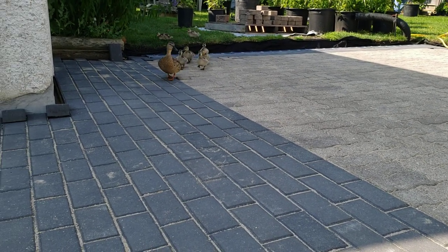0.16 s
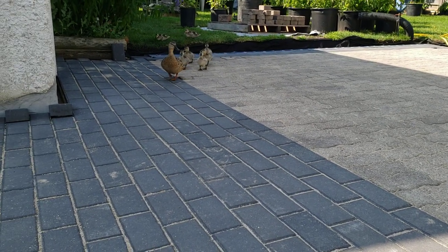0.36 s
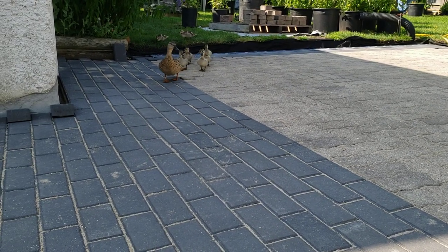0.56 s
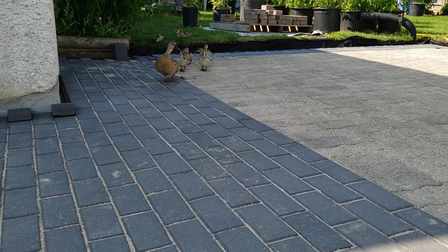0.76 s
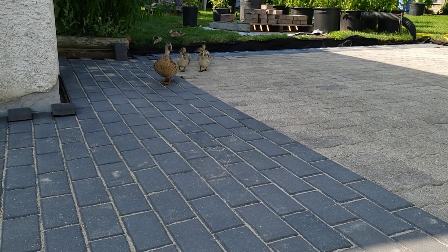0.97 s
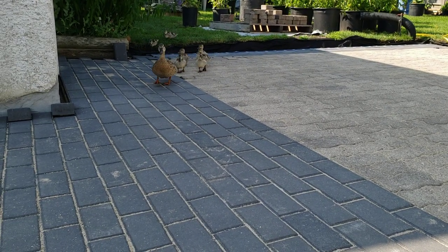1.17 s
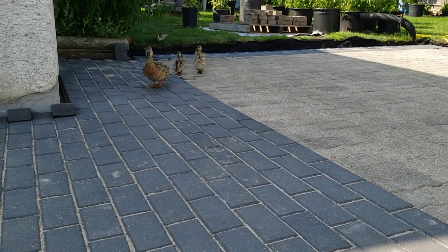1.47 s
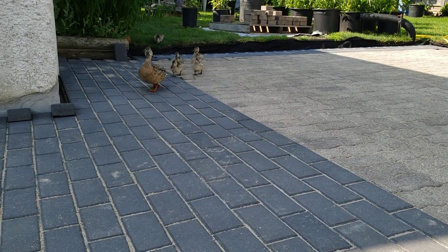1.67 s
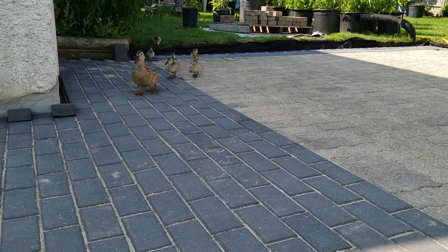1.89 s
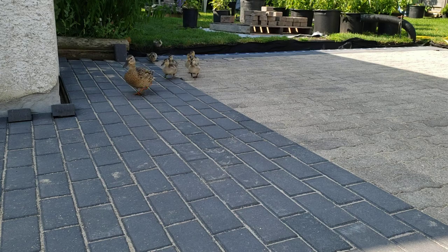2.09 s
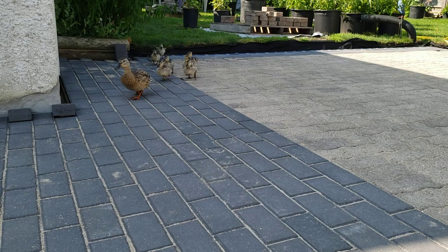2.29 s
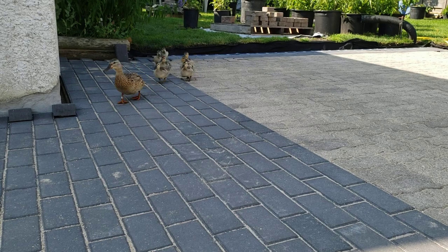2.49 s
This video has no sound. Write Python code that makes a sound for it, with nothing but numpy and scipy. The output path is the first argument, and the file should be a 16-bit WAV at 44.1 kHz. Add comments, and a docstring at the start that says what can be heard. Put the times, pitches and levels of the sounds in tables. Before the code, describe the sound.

Ducklings peep twice, short and high with a quavering fall, at some distance in a paved yard; low wind rumble and faraway machine hum continue beneath, with tiny ticks, faint chirps and light microphone hiss.

```python
"""Ducklings in a paved yard peep twice: quavering, falling whistles, scattered by paving and walls.
Faint chirps (short noisy-pitched slides) and ticks (decaying band-passed noise) sound around them.
A low rumble of coloured noise, its deepest part wind on the microphones, rises and sinks.
Distant machinery hums from the left in wavering tones. A thin, high rustle of grainy noise
comes and goes over the microphone's steady-coloured hiss."""
import sys
import numpy as np
from scipy import signal
from scipy.fft import rfft, irfft
from scipy.io import wavfile

SR = 44100
rng = np.random.default_rng(int(sys.argv[2]) if len(sys.argv) > 2 else 0)


def to_wav(sig):
    """Store sig (one row per channel, or 1-D mono) as 16-bit WAV at the path in sys.argv[1].

    Samples outside -1..1 are clipped; the rate is SR.
    """
    pcm = np.clip(np.atleast_2d(sig), -1, 1) * 32767
    pcm = np.round(pcm).astype(np.int16)
    wavfile.write(sys.argv[1], SR, pcm.T)  # frames by channels


N = 116865


def amp(db):
    """Decibels to gain."""
    return 10 ** (np.asarray(db) / 20)


def unit(x):
    """Scales to rms 1."""
    return x / np.sqrt(np.mean(x ** 2) + 1e-20)


def bins():
    """Frequencies of a full-length spectrum [Hz]."""
    return np.fft.rfftfreq(N, 1 / SR)


def colour(points):
    """Interpolates a table on a log-frequency axis."""
    hz, value = np.transpose(points)
    return np.interp(np.log(bins() + 1), np.log(hz + 1), value)


def curve(points):
    """Interpolates a table over time."""
    time_s, value = np.transpose(points)
    return np.interp(np.arange(N) / SR, time_s, value)


def shape(x, gain):
    """Applies a gain per frequency bin."""
    return irfft(rfft(x) * gain, N)


def drift(rate_hz):
    """Smooth random curve of rms 1: noise under a Gaussian low-pass."""
    return unit(shape(rng.standard_normal(N), np.exp(-(bins() / rate_hz) ** 2)))


def pan(lean_db):
    """Left and right gains for a left-minus-right level difference."""
    return amp(np.array([[.5], [-.5]]) * lean_db)


def add(mix, start_s, sound):
    """Mixes a sound in place at a start time, cut at the end of the mix."""
    start = max(round(start_s * SR), 0)
    part = mix[..., start:][..., :sound.shape[-1]]
    part += sound[..., :part.shape[-1]]


PORT_DELAY_S = 0.000393


def ports(pair):
    """Sound from the left reaches the right microphone port a little later."""
    late = np.exp(-2j * np.pi * bins() * PORT_DELAY_S)
    return np.array([pair[0], shape(pair[1], late)])


# Noise shared by the ports: (frequency [Hz], left-right likeness [0..1])
PORT_LIKENESS = [(35, .35), (70, .72), (130, .93), (300, .82), (700, .42), (1600, .38), (3000, .2),
                 (8000, .05)]
FLUTTER_RMS_DB, FLUTTER_HZ = 0.75, 15


def air(spectrum):
    """Gently fluttering noise, partly shared by both ports, each with its own colour."""
    flutter = amp(FLUTTER_RMS_DB * drift(FLUTTER_HZ))
    a, b = rfft(rng.standard_normal((2, N)) * flutter)
    same = np.clip(colour(PORT_LIKENESS), 0, 1)
    left = a * amp(colour([(hz, db) for hz, db, _ in spectrum]))
    right = (same * a + np.sqrt(1 - same ** 2) * b) * amp(colour([(hz, db) for hz, _, db in spectrum]))
    return ports(np.sqrt(SR / 2) * irfft(np.array([left, right]), N))


# Rumble spectrum before level curves: (frequency [Hz], left density [dB/Hz], right density [dB/Hz])
RUMBLE_SPECTRUM = [(11.8, -100, -100), (21.3, -77, -85.5), (33.3, -79.5, -74), (52, -65, -62.5),
                   (90.6, -69, -68.5), (132.7, -69, -67), (214, -74.5, -72), (323, -81, -80.5),
                   (457, -86.5, -82.5), (810, -94, -86.5), (1112, -88.5, -89), (1163, -99, -90.5),
                   (1670, -90.5, -100), (1728, -90.5, -105), (2236, -105, -109), (2890, -112, -115),
                   (4930, -140, -140)]
# Gain below the crossover: (time [s], level [dB])
BASS_LEVEL = [(0, -8), (.14, 2), (.21, -3), (.33, -0.5), (.48, -2.5), (.58, -1), (.66, 2.5), (.9, -6.5),
              (1.09, 6), (1.16, 0), (1.32, 1.5), (1.41, -2.5), (1.5, 3), (1.72, 1), (1.85, 3.5),
              (2.17, -4.5), (2.27, 2.5), (2.38, 0.5), (2.65, -1)]
# Gain above the crossover: (time [s], level [dB])
UPPER_LEVEL = [(0, -1.5), (.9, -1), (1.6, -1), (2.1, -1), (2.65, 0)]
BASS_CROSSOVER_HZ = 123


def rumble():
    """Low noise split at a crossover; its deepest part, wind on the microphones, rises and sinks."""
    noise = air(RUMBLE_SPECTRUM)
    bass = shape(noise, 1 / (1 + (bins() / BASS_CROSSOVER_HZ) ** 6))
    return bass * amp(curve(BASS_LEVEL)) + (noise - bass) * amp(curve(UPPER_LEVEL))


# Hiss spectrum: (frequency [Hz], left density [dB/Hz], right density [dB/Hz])
HISS_SPECTRUM = [(1850, -120, -120), (3450, -111, -114), (4600, -118, -119), (6630, -118, -124),
                 (7880, -127, -129), (10250, -120, -121), (12400, -113, -114), (16000, -114, -113)]


def hiss():
    """Microphone hiss: noise with a fixed colour and slight flutter."""
    return air(HISS_SPECTRUM)


# Machine tones: (frequency [Hz], level [dB], left minus right [dB])
HUM_TONES = [(161.9, -60, -4.5), (262.4, -63, -2), (357.2, -61, 3), (479.7, -79.5, -1.5),
             (647.4, -71.5, -12), (780, -87, 0.5), (899, -78.5, -10.5), (1360, -96, 2.5), (1442, -78, 5),
             (1586, -78, 8.5)]
# Deepest tone: (time [s], level [dB])
DRONE_LEVEL = [(0, -66), (.55, -50.5), (.75, -50.5), (.95, -53.5), (1.4, -57), (1.58, -42.5), (1.75, -47),
               (1.9, -66), (2.3, -46.5), (2.65, -49.5)]
DRONE_HZ, DRONE_LEAN_DB = 108.4, -3.5
WANDER_RMS_HZ, WAVER_RMS, WAVER_RATE_HZ = 4.5, .7, 13  # waver: share of gain, before unit()


def hum():
    """Distant machinery tones, random in pitch and gain; the deepest swells and recedes."""
    out = np.zeros((2, N))
    drone = (DRONE_HZ, curve(DRONE_LEVEL), DRONE_LEAN_DB)
    for hz, db, lean_db in HUM_TONES + [drone]:
        cycles = np.cumsum(hz + WANDER_RMS_HZ * drift(WAVER_RATE_HZ)) / SR
        tone = np.sqrt(2) * np.sin(2 * np.pi * (cycles + rng.random()))
        waver = unit(1 + WAVER_RMS * drift(WAVER_RATE_HZ))
        out += amp(db) * pan(lean_db) * waver * tone
    return ports(out)


# Swells, each channel 3 dB above this before the lean: (time [s], level [dB])
RUSTLE_LEVEL = [(0, -105), (1.32, -100), (1.36, -70.5), (1.44, -71.5), (1.53, -78), (1.64, -81),
                (1.71, -75), (1.79, -100), (2.18, -78), (2.23, -71), (2.41, -68), (2.45, -63),
                (2.52, -65.5), (2.55, -69.5), (2.6, -77), (2.65, -77)]
# Relative spectrum: (frequency [Hz], density [dB])
RUSTLE_SPECTRUM = [(3000, -2.5), (5200, -16.5), (6500, -4), (7900, -28), (9000, -15.5), (10500, -5),
                   (13000, -4.5), (15500, -0.5)]
# Stereo position: (time [s], left minus right [dB])
RUSTLE_POSITION = [(1.4, 0.5), (2.25, 1.5), (2.47, 0), (2.55, 7)]
GRAIN_RMS_DB, GRAIN_RATE_HZ = 1.5, 148


def rustle():
    """Thin high noise, grainy by fast random gain, in a few swells."""
    grains = rng.standard_normal((2, N)) * amp(GRAIN_RMS_DB * drift(GRAIN_RATE_HZ))
    noise = np.sqrt(2) * unit(shape(grains, amp(colour(RUSTLE_SPECTRUM))))
    return noise * amp(curve(RUSTLE_LEVEL)) * pan(curve(RUSTLE_POSITION))


# Taps: (time [s], onset level [dB], centre [Hz], Gaussian width [octaves], left minus right [dB])
TICK_EVENTS = [(.803, -51, 1640, 0.32, 1), (1.102, -72, 5760, .12, -6), (1.102, -64, 14000, 0.18, -7),
               (1.363, -72, 6200, 0.18, 5), (1.435, -60, 13500, 0.18, -8), (2.072, -46.5, 665, 0.21, -2),
               (2.477, -72, 11000, .6, 0), (2.549, -59, 13080, 0.21, 3)]
TICK_DECAY_S = 0.0016  # to 1/e


def ticks():
    """Tiny dry taps: exponentially decaying noise through a log-Gaussian band."""
    out, t = np.zeros((2, N)), np.arange(N) / SR
    for start_s, db, hz, octaves, lean_db in TICK_EVENTS:
        band = unit(np.exp(-.5 * (np.log2((bins() + 1) / hz) / octaves) ** 2))
        decay = (t >= start_s) * np.exp(-abs(t - start_s) / TICK_DECAY_S)
        burst = rng.standard_normal((2, N)) * decay
        out += amp(db) * pan(lean_db) * shape(burst, band)
    return out


# Direct gain: (left [dB], right [dB])
DIRECT_GAIN_DB = [-4.5, -10]
# Wall echoes: (delay [s], left gain [dB], right gain [dB])
WALL_ECHOES = [(.0075, -11.5, -21), (0.0142, -14.5, -12), (0.0371, -17, -24)]
# Right-port colour for direct, scattered and wall sound: (frequency [Hz], gain [dB])
RIGHT_PORT_COLOUR = [(2400, 1), (2800, 0.5), (3200, 1.5), (3750, -5.5), (4300, -2), (6000, -9)]
SCATTER_DB, SCATTER_T60_S, SCATTER_RISE_S = [-1.5, -7], 0.22, 0.0063  # levels: left, right
TAIL_DB, TAIL_T60_S, TAIL_RISE_S = [-11, -20], 0.31, 0.038
ECHO_DENSITY_PER_S = 2000
FAR_ECHO_S, FAR_ECHO_DB = 0.12, -28


def reflections(x, db, t60_s, rise_s):
    """Sparse random echoes that build up and die away, set to unit energy before the gain."""
    t = np.arange(SR // 2) / SR
    hits = rng.random((2, len(t))) < ECHO_DENSITY_PER_S / SR
    taps = rng.standard_normal((2, len(t))) * hits
    taps = taps * np.exp(-np.log(1000) * t / t60_s) * np.minimum(t / rise_s, 1)
    taps = taps / np.linalg.norm(taps, axis=1, keepdims=True)
    return amp(db)[:, None] * signal.fftconvolve(x[None], taps, axes=1)[:, :N]


def yard(x):
    """Direct sound, wall echoes, uneven paving scatter, and a faint echo and tail from the garden."""
    near = amp(DIRECT_GAIN_DB)[:, None] * x
    near = near + reflections(x, SCATTER_DB, SCATTER_T60_S, SCATTER_RISE_S)
    for delay_s, left_db, right_db in WALL_ECHOES:
        add(near, delay_s, amp([left_db, right_db])[:, None] * x)
    near[1] = shape(near[1], amp(colour(RIGHT_PORT_COLOUR)))
    add(near, FAR_ECHO_S, amp(FAR_ECHO_DB) * near)
    return near + reflections(x, TAIL_DB, TAIL_T60_S, TAIL_RISE_S)


QUAVER_HZ, QUAVER_SPREAD_HZ = 280, 120  # mean rate, rms spread

# Faint calls before the yard: (start [s], length [s], level at envelope peak [dB], mid pitch [Hz],
# fall [share of pitch], rms jitter [share of pitch])
CHIRP_EVENTS = [(0.68, 0.028, -79, 5180, .05, 0.042), (1.498, 0.018, -74.5, 5900, -0.024, .035),
                (1.546, 0.026, -64.5, 2970, 0.0026, .02), (2.058, 0.034, -74.5, 3660, 0.041, .045),
                (2.181, 0.04, -74.5, 5000, -.08, 0.042)]


def chirps():
    """Short tones sliding in pitch under a half-sine envelope, roughened by random pitch jitter."""
    out = np.zeros(N)
    for start_s, length_s, db, hz, fall, jitter in CHIRP_EVENTS:
        u = np.linspace(0, 1, int(length_s * SR))
        pitch_hz = hz * (1 + fall * (.5 - u) + jitter * drift(QUAVER_HZ)[:len(u)])
        phase = 2 * np.pi * np.cumsum(pitch_hz) / SR
        add(out, start_s, np.sqrt(2) * amp(db) * np.sin(np.pi * u) * np.sin(phase))
    return out


QUAVER_RMS, QUAVER_REF_HZ, QUAVER_GROWTH = .04, 3300, 1.6  # share of pitch at ref; exponent
EDGE_S, OCTAVE_DB = 0.0012, -36


def whistle(hz, gain):
    """Nearly pure tone, soft-ended, with a fast uneven quaver that widens on high notes."""
    t = np.arange(len(hz)) / SR
    rate_hz = QUAVER_HZ + QUAVER_SPREAD_HZ * drift(QUAVER_HZ)[:len(t)]
    quaver = np.sqrt(2) * np.sin(2 * np.pi * np.cumsum(rate_hz) / SR)
    depth = QUAVER_RMS * (hz / QUAVER_REF_HZ) ** QUAVER_GROWTH
    phase = 2 * np.pi * np.cumsum(hz * (1 + depth * quaver)) / SR
    ends = np.clip(np.minimum(t, t[-1] - t) / EDGE_S, 0, 1)
    return np.sqrt(2) * gain * ends * (np.sin(phase) + amp(OCTAVE_DB) * np.sin(2 * phase))


# Loud calls before the yard, one list per peep: (time [s], pitch [Hz], level [dB])
PEEP_COURSES = [
    [(1.165, 3830, -72), (1.180, 3786, -56.5), (1.195, 3830, -59), (1.200, 3480, -56), (1.210, 3327, -51),
     (1.224, 3285, -52.5), (1.236, 3114, -50), (1.241, 2750, -55), (1.252, 2300, -62)],
    [(2.318, 3790, -64), (2.331, 3870, -56), (2.341, 3724, -47.5), (2.351, 3830, -56), (2.355, 3270, -48.5),
     (2.368, 3215, -47), (2.386, 3000, -48), (2.394, 2810, -57), (2.402, 2150, -58)],
]


def peeps():
    """Duckling whistles that open on a high, rough note, break to a lower one and trail off."""
    out = np.zeros(N)
    for course in PEEP_COURSES:
        time_s, hz, db = np.transpose(course)
        t = np.arange(time_s[0], time_s[-1], 1 / SR)
        pitch_hz = np.interp(t, time_s, hz)
        gain = amp(np.interp(t, time_s, db))
        add(out, time_s[0], whistle(pitch_hz, gain))
    return out


def scene():
    """Ducklings in the yard over the background."""
    background = rumble() + hiss() + hum() + rustle() + ticks()
    return background + yard(chirps() + peeps())


CUTOFF_HZ, END_SAMPLES = 15750, 150


def record(dry):
    """Linear fades at both ends, then a steep linear-phase low-pass."""
    index = np.arange(N)
    ends = np.minimum(np.minimum(index, index[::-1]) / END_SAMPLES, 1)
    lowpass = signal.firwin(1023, CUTOFF_HZ, window=("kaiser", 9), fs=SR)
    return signal.oaconvolve(dry * ends, lowpass[None], "same")


dry = scene()
out = record(dry)
to_wav(out)
```